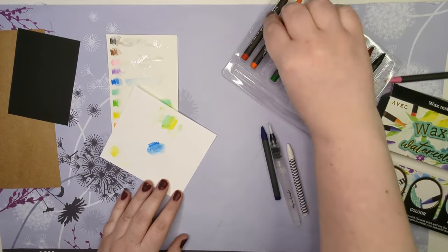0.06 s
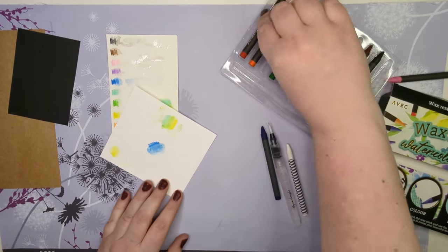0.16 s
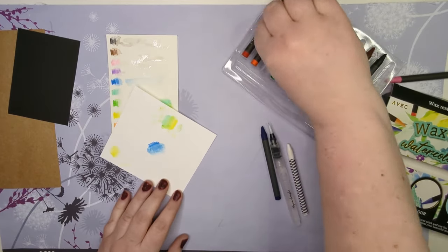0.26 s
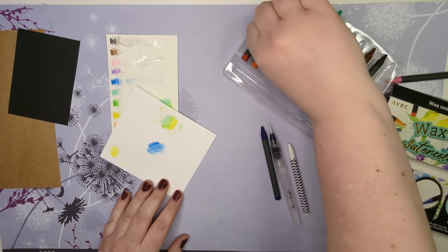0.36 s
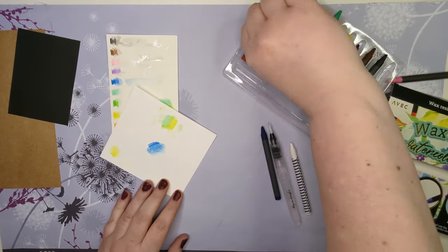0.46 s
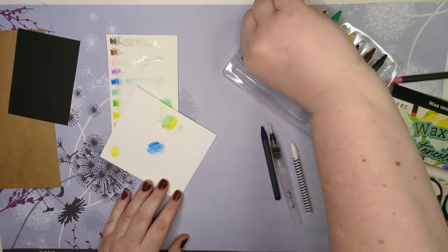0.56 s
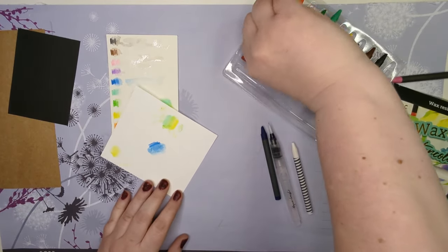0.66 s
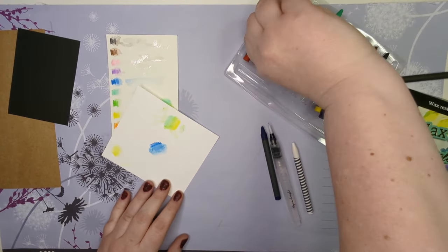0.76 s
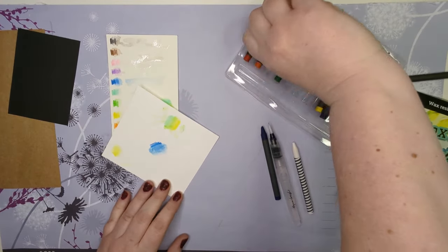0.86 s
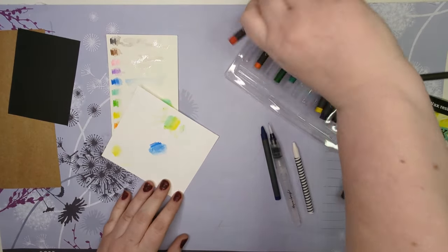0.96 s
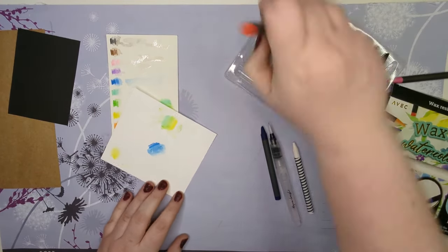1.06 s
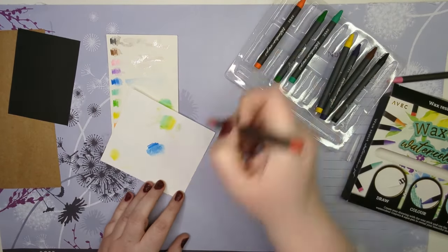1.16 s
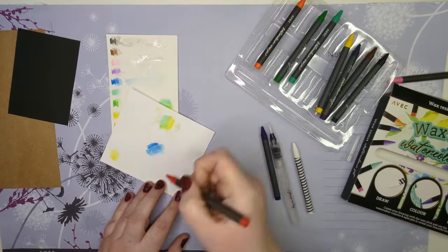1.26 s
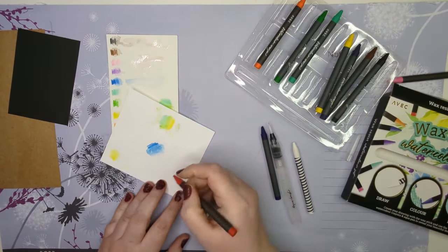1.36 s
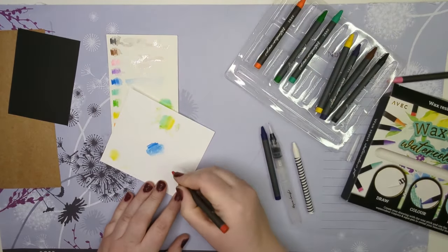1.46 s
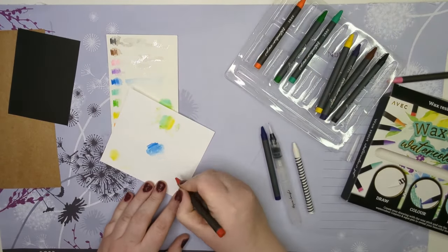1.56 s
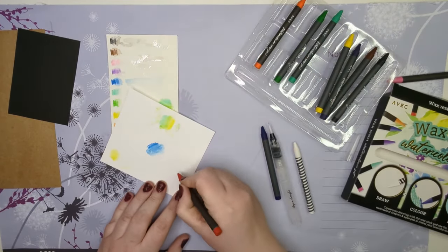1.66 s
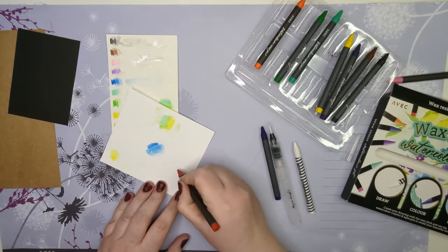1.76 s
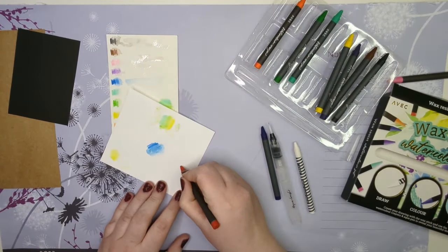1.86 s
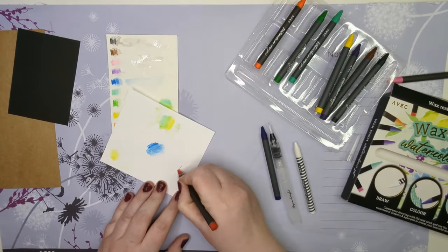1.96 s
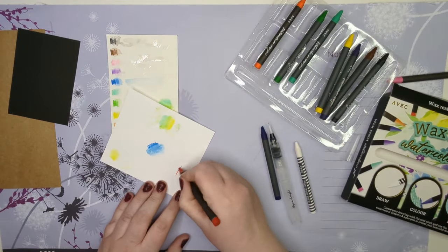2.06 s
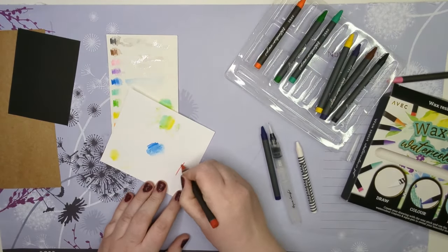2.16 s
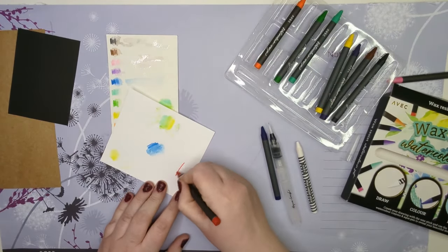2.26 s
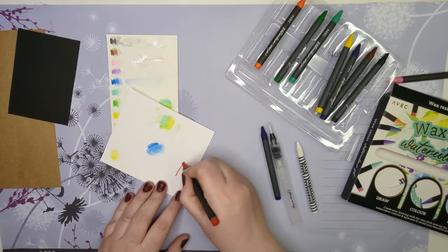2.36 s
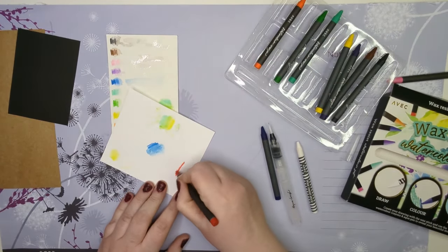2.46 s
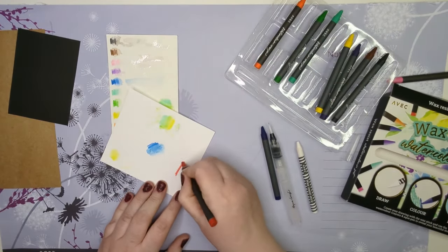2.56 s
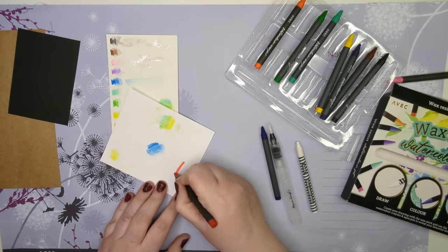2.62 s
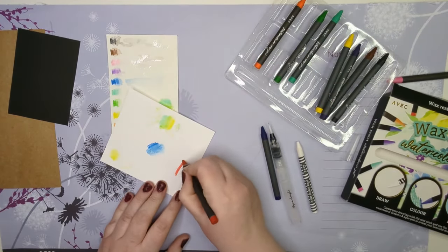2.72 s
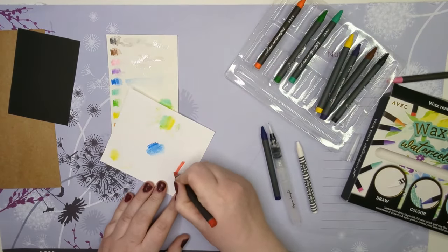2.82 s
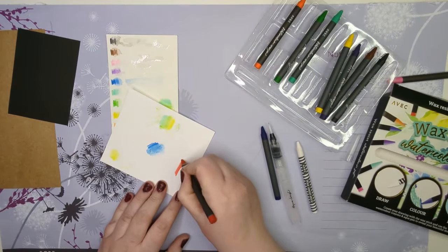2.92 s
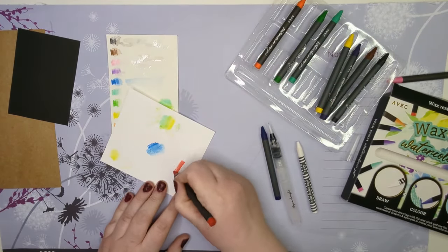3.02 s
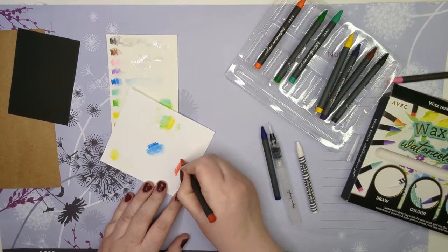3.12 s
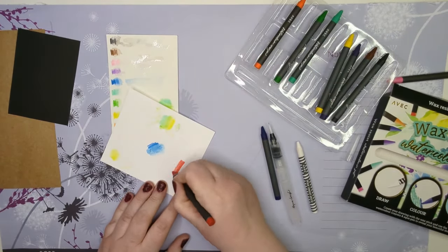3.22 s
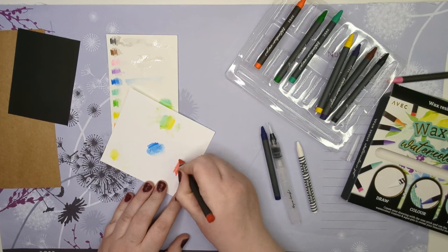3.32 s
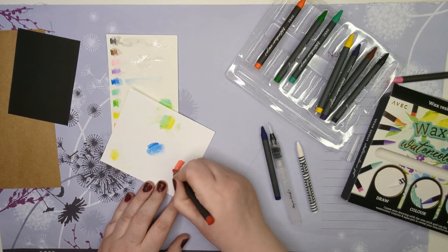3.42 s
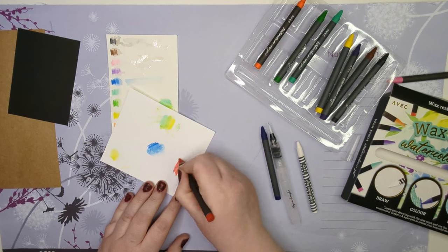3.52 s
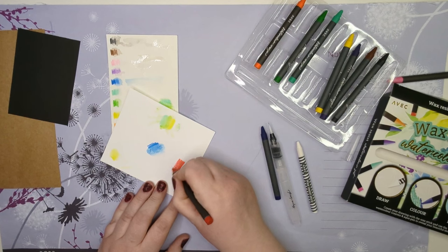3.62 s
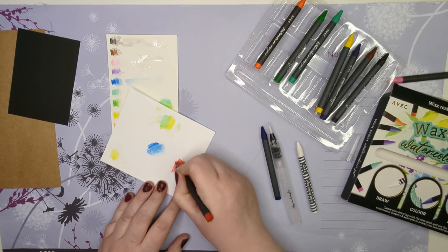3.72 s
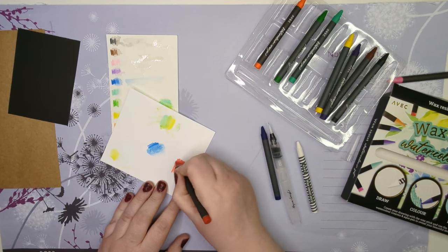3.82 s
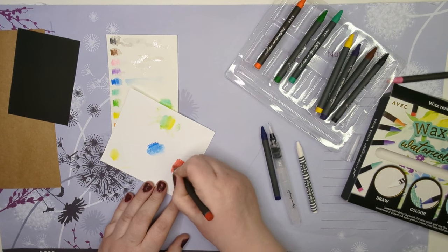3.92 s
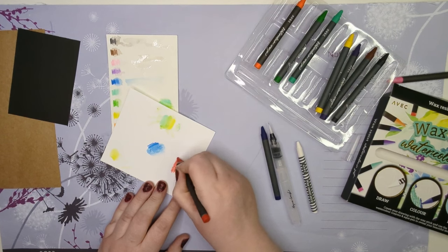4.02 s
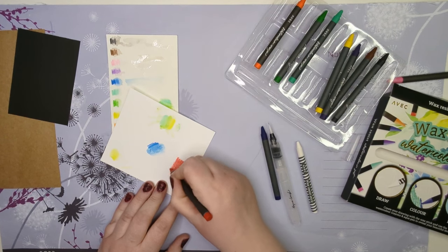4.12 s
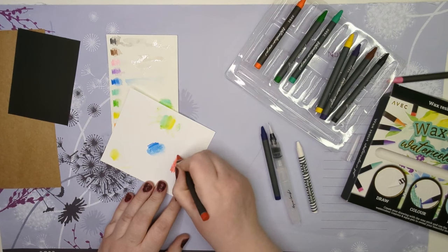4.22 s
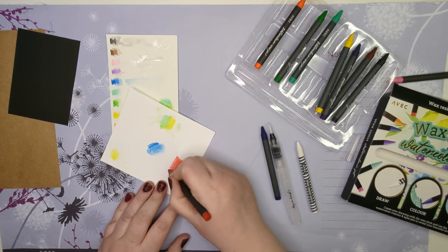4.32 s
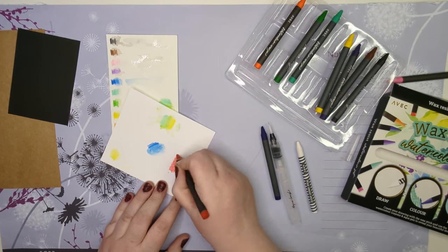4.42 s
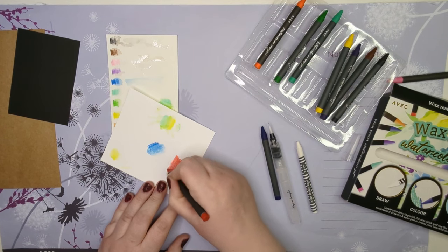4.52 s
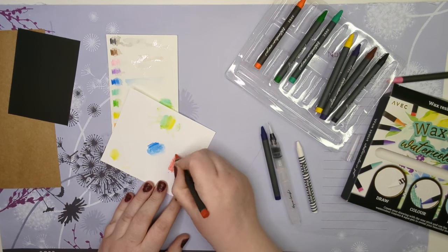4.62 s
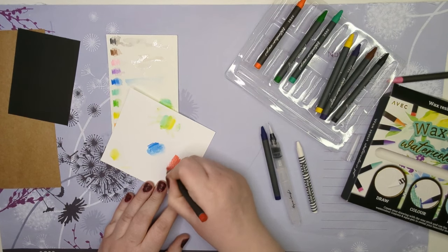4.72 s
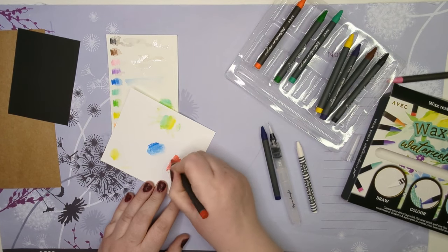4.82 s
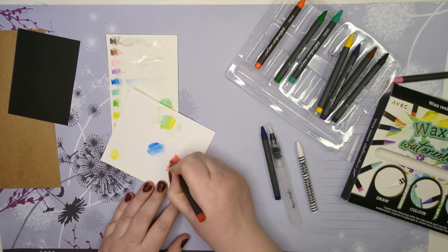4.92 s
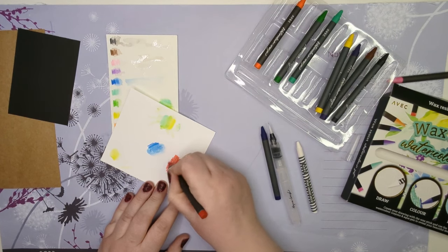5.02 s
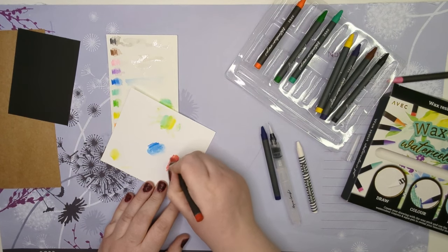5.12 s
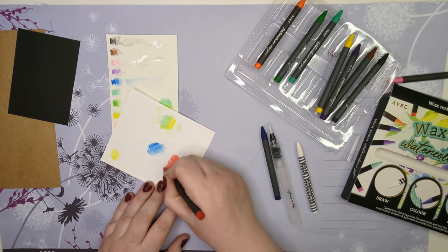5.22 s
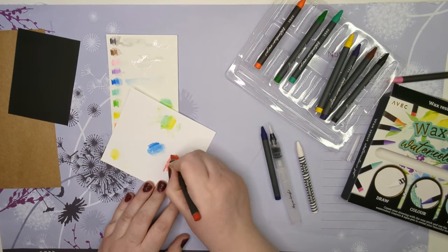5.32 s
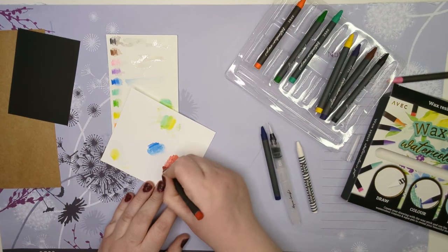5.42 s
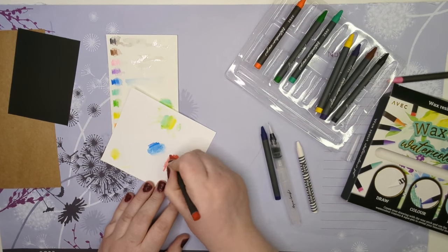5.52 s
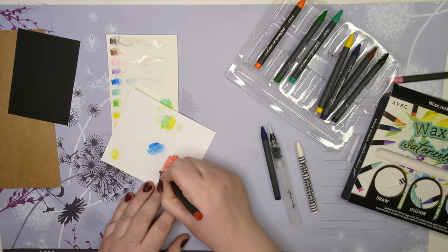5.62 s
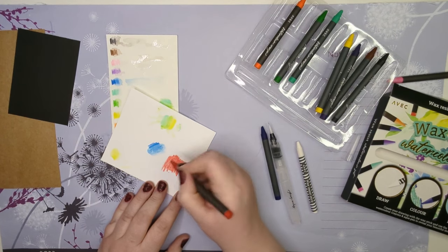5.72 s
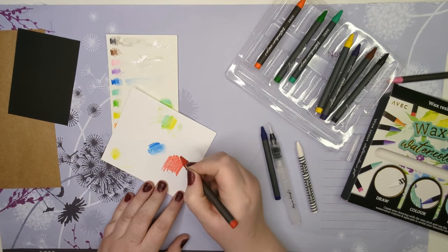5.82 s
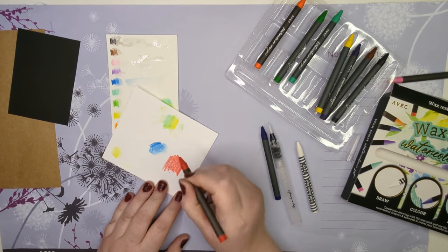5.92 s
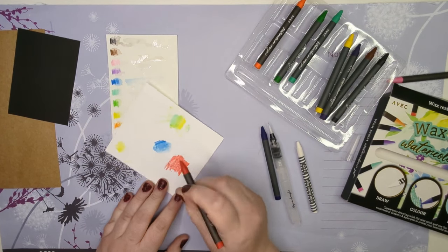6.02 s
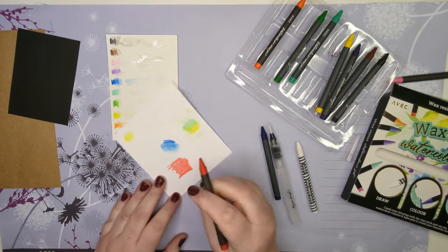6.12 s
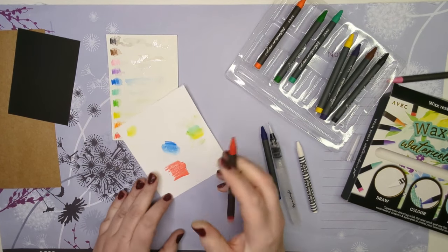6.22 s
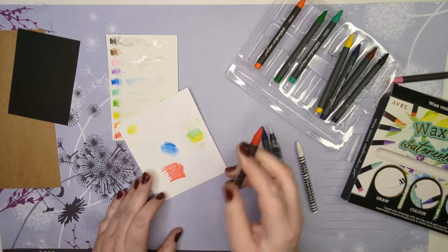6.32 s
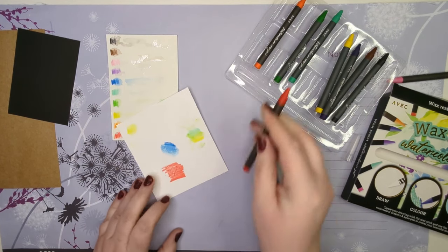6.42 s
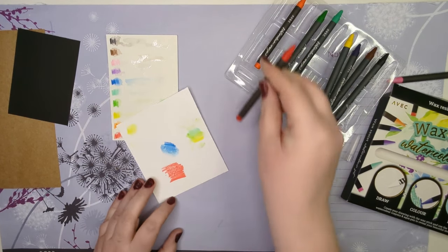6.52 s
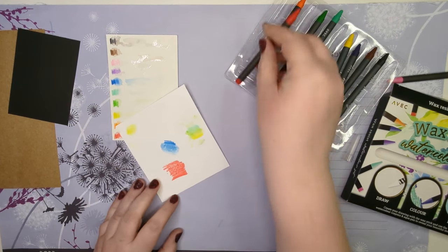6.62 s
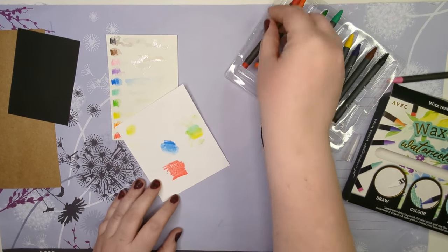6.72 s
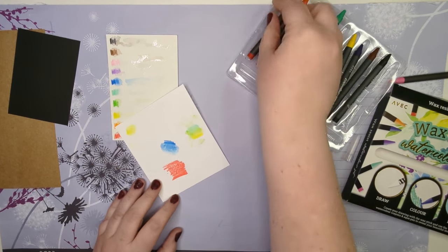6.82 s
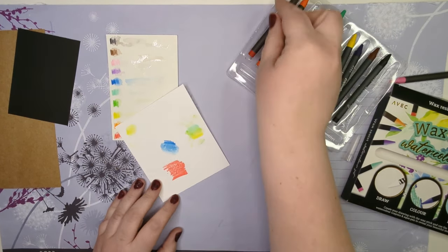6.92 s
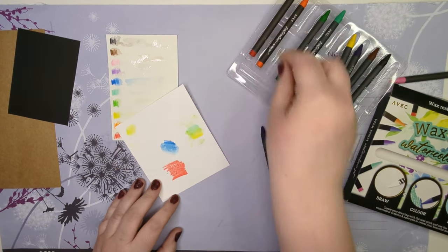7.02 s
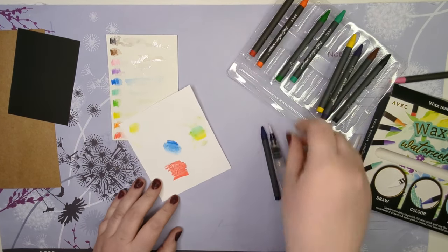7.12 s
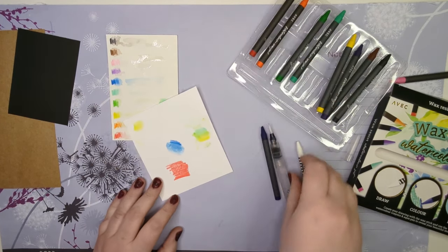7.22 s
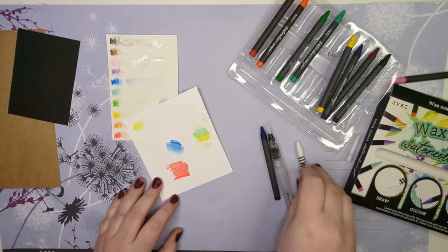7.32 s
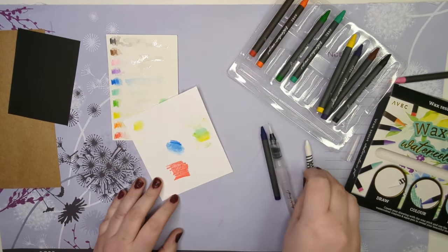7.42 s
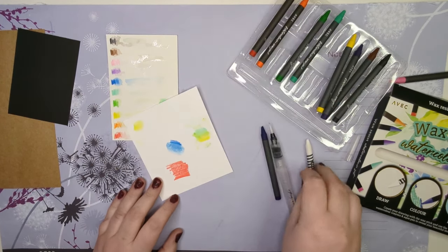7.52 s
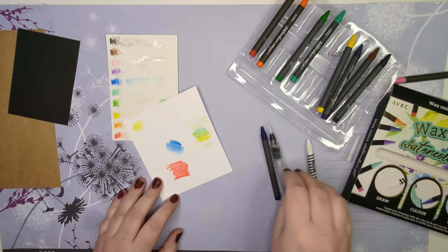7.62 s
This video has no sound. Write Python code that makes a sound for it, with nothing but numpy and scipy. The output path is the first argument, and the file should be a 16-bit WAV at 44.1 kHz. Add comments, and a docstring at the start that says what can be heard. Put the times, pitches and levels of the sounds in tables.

```python
"""Crayon scribbling at a table

A quiet room with a faint electrical whine, the microphones above the table. A wax crayon knocks and
judders out of a thin plastic tray, then scribbles to and fro on a small sheet of paper: the wax sticks
and slips on the grain, and the table drums and sways under it. The sheet is turned with a soft slide,
the crayon is dropped back in the tray and a pen is picked up."""
import sys
import numpy as np
from scipy import signal
from scipy.fft import rfft, irfft, next_fast_len
from scipy.io import wavfile

SR = 44100
rng = np.random.default_rng(int(sys.argv[2]) if len(sys.argv) > 2 else 0)


def master(y):
    """Save y as 16-bit WAV."""
    cut = np.clip(np.atleast_2d(y).T, -1, 1)
    pcm = np.round(cut * 32767)  # scale
    wavfile.write(sys.argv[1], SR, pcm.astype(np.int16))


N = 338247
TIME = np.arange(N) / SR

# Room tone. Each row: frequency in Hz, relative level in dB.
AIR_SPECTRUM = [(25, -28.5), (42, -47), (60, -2), (85, -18), (115, -8), (200, -21.5), (330, -23),
                (800, -23), (1400, -18), (2100, -19), (3200, -22.5), (6800, -27), (8500, -35), (10000, -65),
                (15500, -60)]
# Room tone across the microphone pair. Each row: frequency in Hz, left minus right in dB.
AIR_BALANCE = [(100, -1), (1400, 1), (4000, 0), (7000, -10.5), (10000, -20), (12000, 4), (15000, -15)]
# How alike the two microphones hear diffuse sound. Each row: frequency in Hz, likeness from 0 to 1.
MIC_LIKENESS = [(60, 0.98), (300, 0.4), (700, 0), (1500, 0.13), (4000, 0), (15000, 0.17)]
# Resonances and notches of the microphone housing. Each row: centre in Hz, width in Hz, gain in dB.
MIC_HOUSING = [(820, 450, -2.5), (956, 98, 2), (2960, 170, -1), (3430, 290, 1.5), (4130, 93, -42),
               (4130, 45, 9.5), (5730, 560, -4.5), (6610, 380, 2), (7560, 1500, -3.5)]
# Echoes off things near the microphones. Each row: left and right delay in seconds, level in dB.
NEAR_ECHOES = [(.0013, 0.0015, -18), (.0029, 0.0031, -14), (.0047, .0056, -21)]

# Rumble of the swaying table. Each row: frequency in Hz, relative level in dB.
SWAY_SPECTRUM = [(25, -35.5), (38, -17), (50, -2), (62, -1.5), (82, -15), (110, -4), (150, -21.5),
                 (250, -42.5)]
# The arm leans on the table. Each row: peak time in seconds, length in seconds, level in dB.
ARM_SHOVES = [(0.215, 0.27, -50.5), (0.51, 0.12, -43.5), (1.115, .25, -58), (1.42, 0.32, -46.5),
              (6.833, 0.53, -49.5), (7.047, 0.17, -46.5), (7.35, 0.31, -51), (7.576, 0.096, -53)]
# Modes of the table top. Each row: frequency in Hz, relative level in dB, t60 in seconds.
TABLE_MODES = [(112, -5, .06), (160, -6, .04), (216, 1, .08), (272, 0, .06), (320, -10, .04),
               (450, -13, .03), (550, -11, .03)]
# Soft bumps on the table. Each row: time in seconds, thud in dB, tap in dB.
TABLE_BUMPS = [(1.39, -24.5, -14.5), (1.449, -23, -19.5), (6.788, -11.5, -35), (7.014, -12.5, -8),
               (7.33, -29.5, -27), (7.452, -18.5, -20.5)]
# Fingers, crayon and sheet slide lightly.
# Each row: peak time, rise and fall in seconds, level in dB, share of hiss in dB.
LIGHT_SLIDES = [(1.232, 0.062, 0.053, -46, 7), (1.285, 0.041, 0.022, -52, 12),
                (1.403, 0.018, 0.021, -45.5, -17), (1.47, 0.088, .35, -53, -6), (5.835, 0.1, .06, -50, -3),
                (6.205, 0.28, 0.15, -44.5, -2.5), (6.305, 0.082, 0.055, -50.5, 9),
                (6.47, 0.089, 0.037, -50.5, 3.5), (7.432, 0.032, 0.022, -43, -7)]
# Sliding on the table. Each row: frequency in Hz, relative level in dB.
SLIDE_SPECTRUM = [(150, -3.5), (450, -12), (720, -13), (1000, -1), (1350, 2), (2150, 4), (3200, -2),
                  (5500, -5.5), (7000, -0.5), (9000, -2), (12000, -40)]
# The hiss of light sliding. Each row: frequency in Hz, relative level in dB.
SLIDE_HISS_SPECTRUM = [(2000, -7.5), (4500, -1), (6800, 5), (8500, 3), (9900, -4.5), (12000, 1), (14000, 0),
                       (15800, -7.5)]

# Thin plastic, struck or rubbed. Each row: frequency in Hz, relative level in dB.
PLASTIC_SPECTRUM = [(100, -23.5), (320, -20), (450, -7.5), (650, -6), (790, 1.5), (1050, -1), (1600, 3),
                    (2400, 4.5), (3100, -2.5), (6500, -4), (7800, -6), (10000, -19), (12500, -21),
                    (15500, -30)]
# Modes of the tray's shell. Each row: frequency in Hz, relative level in dB, t60 in seconds.
SHELL_MODES = [(662, 12, 0.029), (1008, 5, 0.13), (1142, 8, 0.051), (1350, 12.5, 0.01), (1614, 3, 0.034),
               (1825, 5, 0.0089), (2260, 6.5, 0.044), (2540, 6.5, 0.031), (3790, 4.5, 0.003),
               (5140, -1, 0.02), (6470, 8, 0.027)]
# The tray across the microphone pair. Each row: frequency in Hz, left minus right in dB.
TRAY_BALANCE = [(500, -2.5), (1400, 1.5), (2300, -0.5), (5000, -3), (6300, 2), (9500, -3.5), (13000, 0)]
# Crayons knock in the tray. Each row: time in seconds, strength in dB, brightness in dB per octave,
# note of the struck spot in Hz, its share in dB, left minus right in dB.
TRAY_KNOCKS = [(0.1804, -11, -4, 2010, -3, 0), (0.186, -7, 0, 7500, -4, 5), (.205, -6, 6.5, 1400, -11, 2),
               (.454, -12, -12, 2000, -8, 3), (.507, -10, -4, 5500, -5, -4), (0.523, -4, 2, 1100, -1, -0.5),
               (.567, -12, -6.5, 1690, -20, 2), (0.6884, -14.5, -3.5, 3600, 3, 1),
               (0.7247, -14, -3, 3630, -14, 5), (.737, -7.5, 1, 1300, -20, -3),
               (.8956, -18, -3, 1500, -1, 3), (0.9222, -12, -5.5, 1608, -5, 6),
               (6.787, 7, -1, 2006, -0.5, -.5), (6.8537, -8.5, -3, 1310, -8, 2),
               (6.9647, 3.5, 0.5, 1456, -13, 5.5), (6.974, -3.5, 8, 13500, -4, 3),
               (7.0086, 8, 1, 6000, -2, 4.5), (7.0149, -1.5, -2.5, 1690, 9, 2.5),
               (7.0478, -0.5, -0.5, 5900, -17, 2)]
# A crayon drags over the tray. Each row: peak time, rise and fall in seconds, level in dB,
# share of the wax tip's hiss in dB, share of the barrel's ring in dB.
TRAY_DRAGS = [(0.208, 0.037, 0.078, -30, -13.5, -17), (.308, 0.042, 0.041, -33, -12, -27),
              (.442, 0.083, 0.031, -35, -19, -15), (.53, 0.085, 0.098, -45, -14, -12),
              (.74, 0.04, 0.035, -34, -20, -15), (.838, 0.12, 0.072, -36, -14, -11),
              (.945, 0.042, 0.049, -38.5, -26, -18), (6.805, 0.015, 0.031, -42, -28, -8),
              (6.913, 0.047, 0.032, -28, -8.5, -20), (7.012, 0.025, 0.033, -33, -23, -17),
              (7.044, 0.057, 0.029, -29.5, -23, -17)]

# The scribble, a quick push and a slower pull back.
# Each row: start in seconds, length of the push in seconds, push accent in dB, pull accent in dB.
CRAYON_STROKES = [(2.007, 0.07, -7, -1.5), (2.221, 0.074, -3, 1), (2.433, 0.063, -2, 1),
                  (2.635, 0.057, 1, 0.5), (2.829, 0.067, -.5, 0.5), (3.045, 0.059, 1, 0.5),
                  (3.236, 0.072, 1, 0), (3.455, 0.057, -1, 0.5), (3.659, 0.069, 0, 2),
                  (3.889, 0.061, 0, 0.5), (4.095, 0.076, -1, 1.5), (4.33, 0.058, 0.5, 2.5),
                  (4.538, 0.07, 0.5, 1.5), (4.75, 0.071, 1, 1.5), (4.983, 0.065, -2, 1),
                  (5.188, 0.073, 3, 2), (5.426, 0.055, 0.5, 0), (5.62, 0.071, 3.5, 0)]
# How hard the hand bears down. Each row: time in seconds, relative pressure in dB.
HAND_PRESSURE = [(2.0, 2.5), (2.3, 0), (2.8, -10), (3.7, -4.5), (4.35, 3), (4.6, -1.5), (4.8, 4.5),
                 (5.2, 5), (5.45, 0.5), (5.65, -2.5)]
# Wax on paper grain. Each row: frequency in Hz, relative level in dB.
SCRATCH_SPECTRUM = [(200, -8.5), (380, -17.5), (560, -8.5), (760, -13.5), (1050, -5.5), (2100, 2.5),
                    (3000, -2.5), (5000, -3), (6700, -3), (8600, -6), (10500, -21), (15000, -52)]
# The paper's fine hiss. Each row: frequency in Hz, relative level in dB.
PAPER_HISS_SPECTRUM = [(4000, -36), (7000, 1), (8500, 5.5), (9900, -5.5), (11500, 4), (14000, 0),
                       (15800, -2.5)]
# That hiss through the scribble. Each row: time in seconds, level in dB.
PAPER_HISS_LEVEL = [(2.0, -57.5), (2.3, -53), (2.75, -56.5), (3.1, -51), (3.5, -51), (3.75, -49),
                    (4.75, -47.5), (5.05, -51), (5.5, -52)]
# The tip's dull thud through the paper. Each row: frequency in Hz, relative level in dB.
THUD_SPECTRUM = [(100, -33), (200, -16.5), (275, 3.5), (310, -2.5), (380, -17), (560, -11.5), (800, -19.5),
                 (1100, -17.5), (2500, -38)]


def from_db(db):
    """Decibels to gain."""
    return 10 ** (np.asarray(db) / 20)


def unit_rms(x):
    """Scale to unit power."""
    return x / np.sqrt(np.mean(x ** 2) + 1e-20)


def unit_energy(x):
    """Scale a response to unit energy, averaged over its channels."""
    return unit_rms(x) / np.sqrt(x.shape[-1])


def in_time(points):
    """Join (seconds, value) points by straight lines."""
    return np.interp(TIME, *np.transpose(points))


def at_hz(points, hz):
    """Read a spectrum on a log-frequency axis."""
    knots_hz, values = np.transpose(points)
    return np.interp(np.log(hz + 1), np.log(knots_hz), values)


def bins(size):
    """Frequencies of an FFT."""
    return np.arange(size // 2 + 1) * SR / size


def colour(x, spectrum, tilt_db=0):
    """Minimum-phase filter with the given spectrum, tilted by tilt_db per octave."""
    size = 2 * next_fast_len(x.shape[-1] // 2 + 2048)
    hz = bins(size)
    gain = from_db(at_hz(spectrum, hz) + tilt_db * np.log2(hz + 200))
    cepstrum = irfft(np.log(gain))
    cepstrum[1:size // 2] *= 2   # folding onto positive time makes the filter causal
    cepstrum[size // 2 + 1:] = 0
    return irfft(rfft(x, size) * np.exp(rfft(cepstrum)))[..., :x.shape[-1]]


def convolve(x, response):
    """Play a signal through a response."""
    return signal.fftconvolve(np.atleast_2d(x), response, axes=-1)[:, :N]


def add(out, start_s, sound):
    """Mix a short sound in."""
    start = round(start_s * SR)
    out[:, start:start + sound.shape[-1]] += sound[:, :N - start]


def drift(per_s):
    """A random wander with spread 1."""
    knots = rng.standard_normal(int(N / SR * per_s) + 2)
    return unit_rms(np.interp(TIME * per_s, np.arange(len(knots)), knots))


def swell(peak_s, rise_s, fall_s, roundness=1.72):
    """One movement of the hand: its gain grows from -20 dB over the rise and sinks back over the fall."""
    away = np.maximum((peak_s - TIME) / rise_s, (TIME - peak_s) / fall_s)
    return from_db(-20 * np.minimum(away, 4) ** roundness)


def together(gains):
    """Gain of unrelated movements heard at once: their powers add."""
    return np.sqrt(sum(gain ** 2 for gain in gains))


def decay(t60, size):
    """A fall of 60 dB in t60 seconds."""
    return np.exp(-np.log(1000) * TIME[:size] / t60)


def mode(hz, t60, size):
    """One dying sine."""
    return decay(t60, size) * np.sin(2 * np.pi * hz * TIME[:size])


def ring(modes, size=12000):
    """A body's answer to one push; neighbouring modes swing in opposite directions."""
    swings = (from_db(db) * mode(hz, t60, size) * (-1) ** k for k, (hz, db, t60) in enumerate(modes))
    return unit_energy(sum(swings)[None])


def pan(left_db):
    """Gains at the two microphones, left_db louder on the left."""
    return from_db(np.array([[left_db], [-left_db]]) / 2)


def balance(x, points):
    """Give each microphone's side its own colour."""
    left = colour(x[0], [(hz, db / 2) for hz, db in points])
    right = colour(x[1], [(hz, -db / 2) for hz, db in points])
    return np.array([left, right])


def diffuse(size):
    """Noise from all round: alike at both microphones in the bass, nearly unrelated in the treble."""
    padded = 2 * next_fast_len(size // 2 + 1)
    mid, side = rfft(rng.standard_normal((2, padded)))
    alike = at_hz(MIC_LIKENESS, bins(padded))
    pair = np.sqrt(1 + alike) * mid + np.sqrt(1 - alike) * side * [[1], [-1]]
    return unit_rms(irfft(pair)[:, :size])


def scatter(clicks, lead_s, scatter_db, t60):
    """Each click reaches the left microphone first; its scatter off things nearby is new every time."""
    direct = np.array([clicks, np.roll(clicks, round(lead_s * SR))])
    retained = from_db(-120 / (t60 * SR))   # share of energy left after one sample
    energy = signal.lfilter([1 - retained], [1, -retained], clicks ** 2 + 1e-18)
    return direct + from_db(scatter_db) * np.sqrt(energy) * diffuse(len(clicks))


def slips(per_s, spread_db):
    """Stick and slip: tiny releases of uneven size at random moments."""
    sizes = from_db(spread_db * np.minimum(rng.exponential(1, N), 4))
    signs = rng.choice([-1, 1], N)
    released = rng.random(N) < per_s / SR
    return unit_rms(sizes * signs * released)


def friction(spectrum, per_s, spread_db):
    """Steady rubbing on paper: slips, scattered and coloured."""
    grain = scatter(slips(per_s, spread_db), lead_s=0.00005, scatter_db=8, t60=0.026)
    return unit_rms(colour(grain, spectrum))


def room_tone(level_db=-53):
    """The quiet room's low rumble and hiss, all round the microphones."""
    air = unit_rms(colour(diffuse(N), AIR_SPECTRUM))
    return from_db(level_db) * balance(air, AIR_BALANCE)


def whine(hz=8923, level_db=-62.5):
    """A thin, wavering electrical whine off to the right."""
    waver_hz = 7 * drift(6) + 14 * drift(90)
    phase = 2 * np.pi * np.cumsum(hz + waver_hz) / SR
    return from_db(level_db) * pan(-15) * np.sqrt(2) * np.sin(phase)


def room(x, t60=0.22, wet_db=-13, size=16384):
    """The direct sound, a few close echoes, then a short tail off the walls."""
    early = np.zeros((2, size))
    early[:, 0] = 1
    for left_s, right_s, db in NEAR_ECHOES:
        early[0, round(left_s * SR)] += from_db(db)
        early[1, round(right_s * SR)] += from_db(db)
    fade_in = np.clip(TIME[:size] / 0.0017, 0, 1)
    tail = unit_energy(diffuse(size) * decay(t60, size) * fade_in)
    tail = colour(tail, [(200, 6), (2000, 3), (7000, 2), (15000, 6)])
    return convolve(x, unit_energy(early) + from_db(wet_db) * tail)


def table_sway(rest_db=-64, scribble_db=-50, lurch_db=2.5, settle_s=0.073, rise_share=0.29):
    """The whole table rumbles unevenly with each shove of the arm and with the scribbling's pressure."""
    first_s = CRAYON_STROKES[0][0]
    last_s = CRAYON_STROKES[-1][0] + CRAYON_STROKES[-1][1]
    scribbling = np.clip(np.minimum(TIME - first_s, last_s - TIME) / settle_s + 0.5, 0, 1)
    scribble = scribbling * from_db(scribble_db + 0.43 * in_time(HAND_PRESSURE))
    shoves = [from_db(db) * swell(peak_s, rise_share * length_s, (1 - rise_share) * length_s)
              for peak_s, length_s, db in ARM_SHOVES]
    lurch = from_db(lurch_db * drift(13))
    rumble = unit_rms(colour(diffuse(N), SWAY_SPECTRUM))
    return together(shoves + [from_db(rest_db), scribble]) * lurch * rumble


def sliding(restless_db=-61, restless_hiss_db=-5.5):
    """Skin and paper slide softly over the table; the hands never lie quite still."""
    moves = [(from_db(db) * swell(*timing), hiss_db) for *timing, db, hiss_db in LIGHT_SLIDES]
    moves.append((from_db(restless_db), restless_hiss_db))
    rub_gain = together(gain for gain, _ in moves)
    hiss_gain = together(gain * from_db(hiss_db) for gain, hiss_db in moves)
    rub = rub_gain * friction(SLIDE_SPECTRUM, per_s=12000, spread_db=2)
    hiss = hiss_gain * friction(SLIDE_HISS_SPECTRUM, per_s=11000, spread_db=4.5)
    return rub * pan(-1.5) + hiss * pan(1.88)


def bumps(note_db=-8, size=8192):
    """Hand and pens bump the table: a thud of the top, and a tap with a hollow note."""
    out = np.zeros((2, N))
    note = from_db(note_db) * unit_energy(mode(hz=450, t60=0.083, size=size))
    for start_s, thud_db, tap_db in TABLE_BUMPS:
        click = scatter(signal.unit_impulse(size), lead_s=0.0001, scatter_db=9, t60=0.15)
        tap = unit_energy(colour(click, PLASTIC_SPECTRUM, tilt_db=-3.5))
        add(out, start_s, from_db(thud_db) * ring(TABLE_MODES))
        add(out, start_s, from_db(tap_db) * (tap + note))
    return out


def knock(bright_db, spot_hz, spot_db, spot_cycles=11, size=4096):
    """A crack of thin plastic; the struck spot adds a short note of its own."""
    click = scatter(signal.unit_impulse(size), lead_s=0.00018, scatter_db=1, t60=0.026)
    crack = unit_energy(colour(click, PLASTIC_SPECTRUM, bright_db))
    spot = mode(spot_hz, spot_cycles / spot_hz, size)
    note = unit_energy(convolve(click, spot[None])[:, :size])
    return unit_energy(crack + from_db(spot_db) * note)


def dragging(shell_db=-4, wander_db=3, barrel_hz=3660, barrel_t60=0.012):
    """A crayon judders along the tray; as the contact moves, other modes of the shell take over."""
    moves = [(from_db(db) * swell(*timing), wax_db, barrel_db)
             for *timing, db, wax_db, barrel_db in TRAY_DRAGS]
    rub_gain = together(gain for gain, _, _ in moves)
    wax_gain = together(gain * from_db(wax_db) for gain, wax_db, _ in moves)
    barrel_gain = together(gain * from_db(barrel_db) for gain, _, barrel_db in moves)
    judder = unit_rms(scatter(slips(per_s=3500, spread_db=4), lead_s=0.00019, scatter_db=5.5, t60=0.022))
    wax = wax_gain * unit_rms(colour(judder, SLIDE_HISS_SPECTRUM))
    barrel = convolve(barrel_gain * judder, ring([(barrel_hz, 0, barrel_t60)], size=2048))
    plastic = rub_gain * unit_rms(colour(judder, PLASTIC_SPECTRUM, tilt_db=0.16))
    shell = np.zeros((2, N))
    for hz, db, t60 in SHELL_MODES:
        contact = from_db(db + wander_db * drift(17))
        shell += convolve(plastic * contact, ring([(hz, 0, t60)], size=4096))
    return wax + barrel + plastic + from_db(shell_db) * np.std(plastic) * unit_rms(shell)


def tray(shell_db=-17):
    """Crayons knock and drag in the tray, and its thin shell rings."""
    knocks = np.zeros((2, N))
    for start_s, strength_db, bright_db, spot_hz, spot_db, left_db in TRAY_KNOCKS:
        add(knocks, start_s, from_db(strength_db) * pan(left_db) * knock(bright_db, spot_hz, spot_db))
    shell = from_db(shell_db) * convolve(knocks, ring(SHELL_MODES))
    return balance(knocks + shell + dragging(), TRAY_BALANCE) * pan(1)


def stroke_speed(start_s, length_s, lead_s=0.011, trail_s=0.0038, lean=1.28):
    """The crayon speeds up and stops again at the turn; top speed 1."""
    start = round((start_s - lead_s) * SR)
    end = round((start_s + length_s + trail_s) * SR)
    speed = np.zeros(N)
    speed[start:end] = np.abs(np.sin(np.pi * np.linspace(0, 1, end - start) ** lean))
    return speed


def wax_on_paper(push, pull, pressure_db, scratch_db=-45.5, pull_db=-1.5):
    """Wax catches unevenly on the paper's tooth: a scratch, and a fine hiss that needs more speed."""
    motion = push ** 0.58 + from_db(pull_db) * pull ** 0.58
    scratch_gain = from_db(scratch_db + 0.18 * pressure_db) * motion
    hiss_gain = from_db(in_time(PAPER_HISS_LEVEL)) * (push + pull) ** 0.94
    grip = from_db(drift(180))
    scratch = scratch_gain * friction(SCRATCH_SPECTRUM, per_s=6000, spread_db=2.5)
    hiss = hiss_gain * friction(PAPER_HISS_SPECTRUM, per_s=4000, spread_db=-1)
    return grip * (scratch * pan(-2.1) + hiss * pan(1))


def drumming(push, pull, pressure_db, drum_db=-47.5, pull_db=-6.5, thud_db=-3):
    """The tip thuds through the paper and rings the table top, most in a fast, hard push."""
    drive = from_db(drum_db) * (push ** 1.4 + from_db(pull_db) * pull ** 1.4)
    force = from_db(pressure_db) * drive * slips(per_s=900, spread_db=2.5)
    table = convolve(force, ring(TABLE_MODES))
    thud_gain = from_db(thud_db + 0.75 * pressure_db) * drive
    thud = thud_gain * unit_rms(colour(slips(per_s=900, spread_db=3), THUD_SPECTRUM))
    return (table + thud) * pan(-0.92)


def crayon(turn_s=0.015, pull_s=0.087):
    """The scribble below the microphones: pushes and pulls alternate, ending on a push."""
    pressure_db = in_time(HAND_PRESSURE)
    push = sum(from_db(db) * stroke_speed(start_s, push_s) for start_s, push_s, db, _ in CRAYON_STROKES)
    pull = sum(from_db(db) * stroke_speed(start_s + push_s + turn_s, pull_s)
               for start_s, push_s, _, db in CRAYON_STROKES[:-1])
    return wax_on_paper(push, pull, pressure_db) + drumming(push, pull, pressure_db)


def scene():
    """The table and the room around it, heard from above."""
    on_table = crayon() + tray() + sliding() + bumps()
    return room(on_table) + table_sway() + room_tone() + whine()


def record(dry, low_cut_hz=38, high_cut_hz=15900):
    """The microphone housing colours the sound; then a low cut, clipping at full scale and a high cut."""
    for hz, width_hz, db in MIC_HOUSING:
        band = signal.lfilter(*signal.iirpeak(hz, hz / width_hz, fs=SR), dry)
        dry = dry + (from_db(db) - 1) * band
    low_cut = signal.butter(6, low_cut_hz, "high", fs=SR, output="sos")
    high_cut = signal.ellip(12, 0.1, 80, high_cut_hz, fs=SR, output="sos")
    clipped = np.clip(signal.sosfilt(low_cut, dry), -1, 1)
    return signal.sosfilt(high_cut, clipped)


dry = scene()
out = record(dry)
master(out)
```